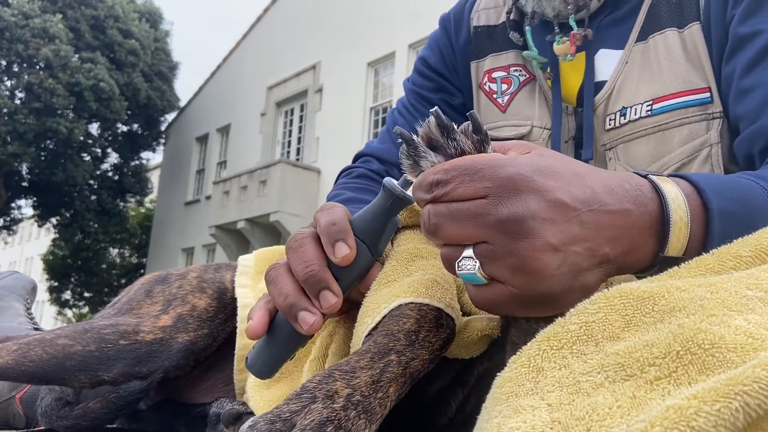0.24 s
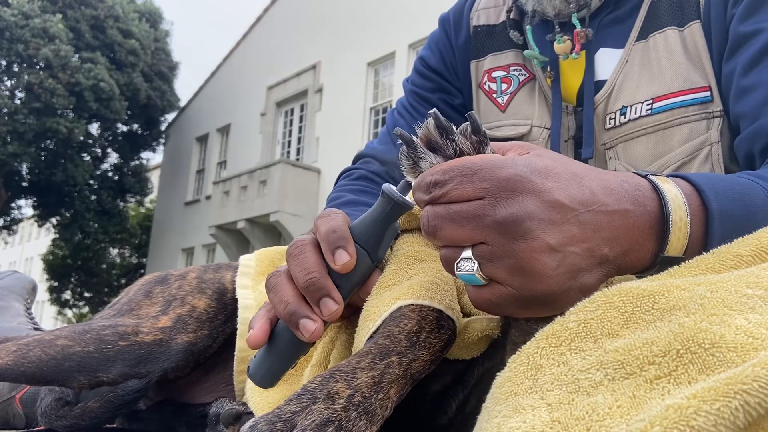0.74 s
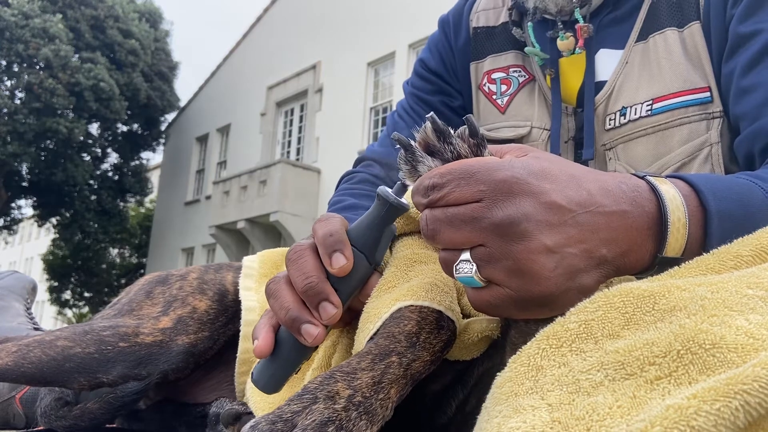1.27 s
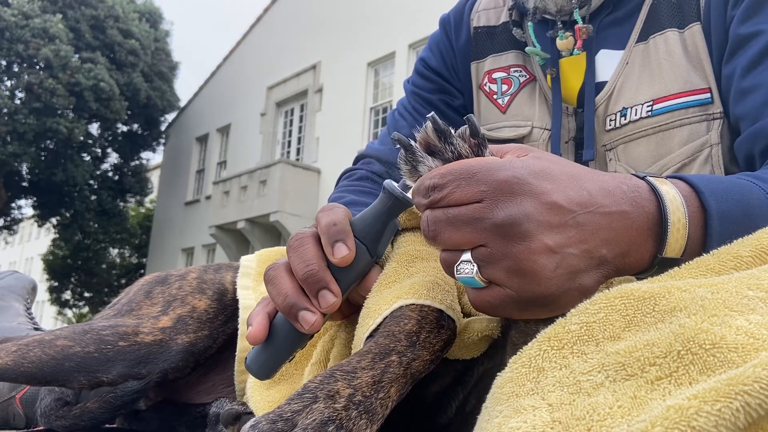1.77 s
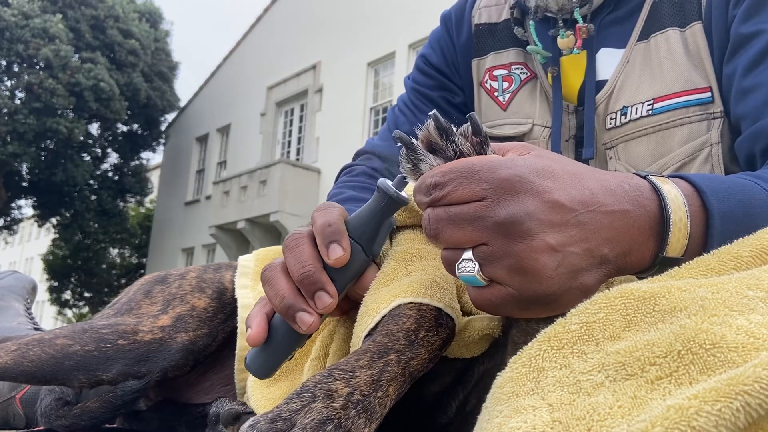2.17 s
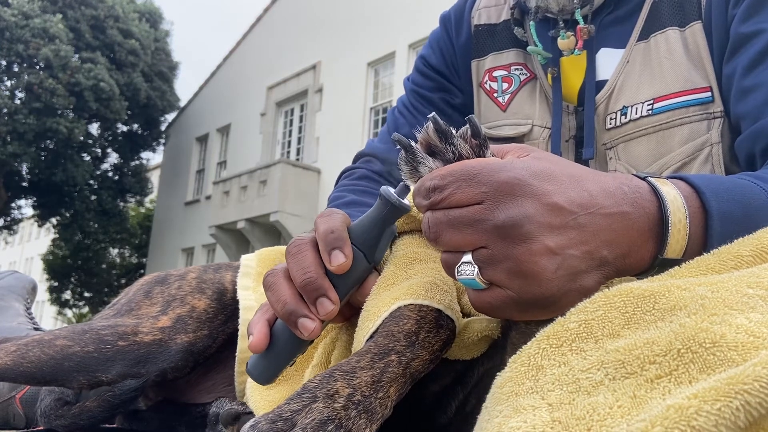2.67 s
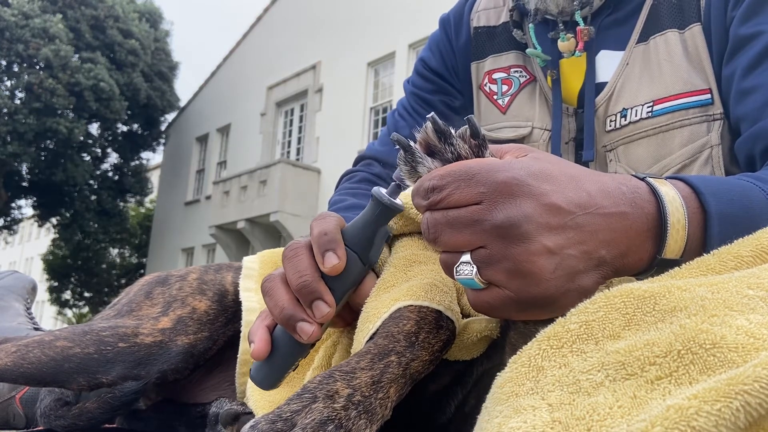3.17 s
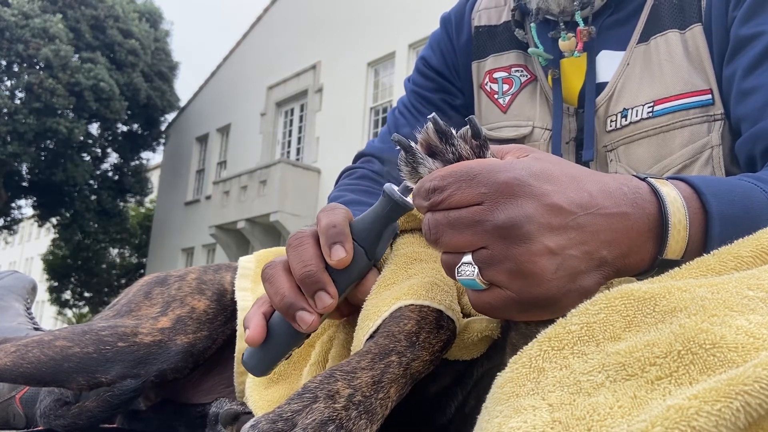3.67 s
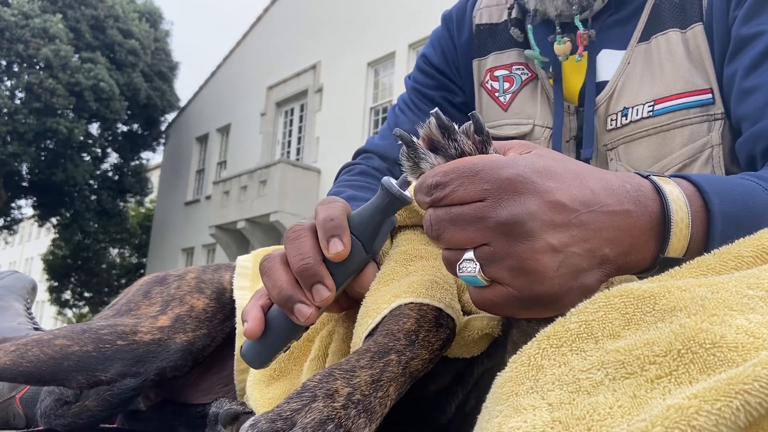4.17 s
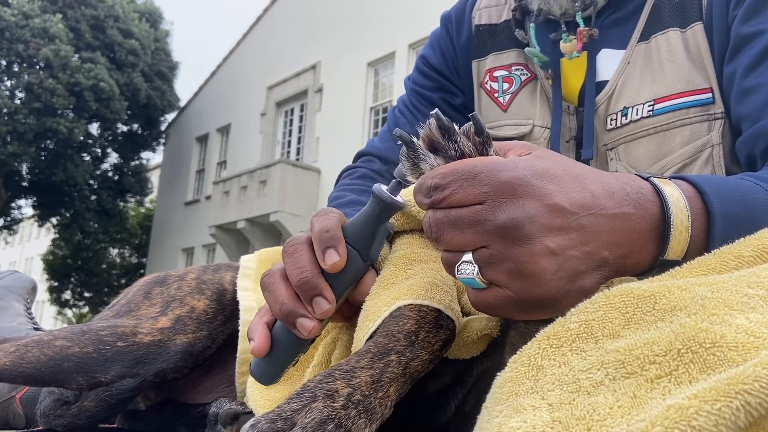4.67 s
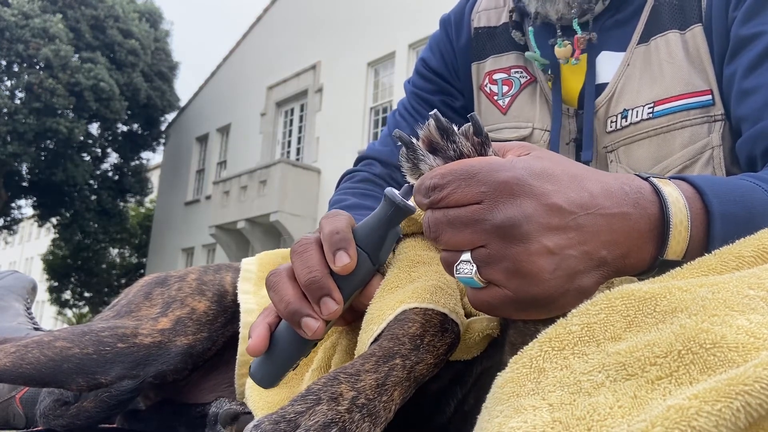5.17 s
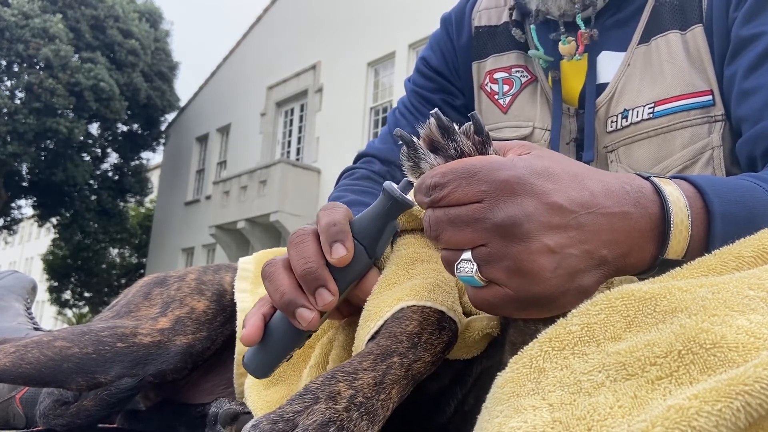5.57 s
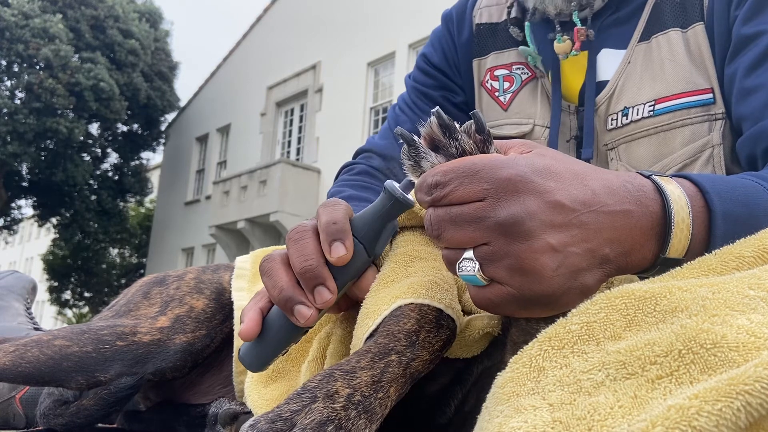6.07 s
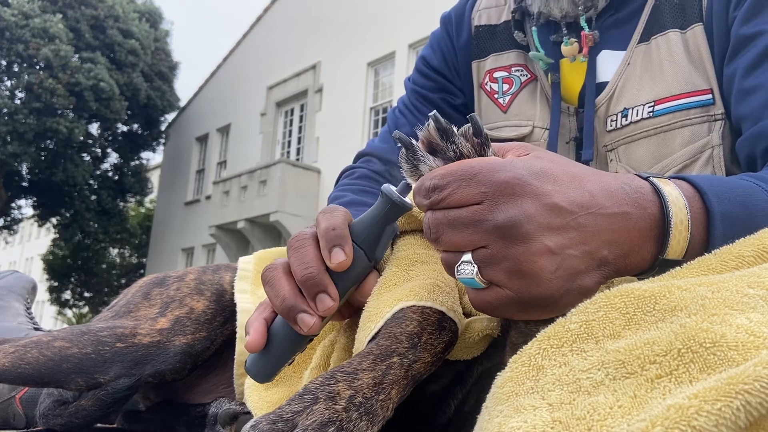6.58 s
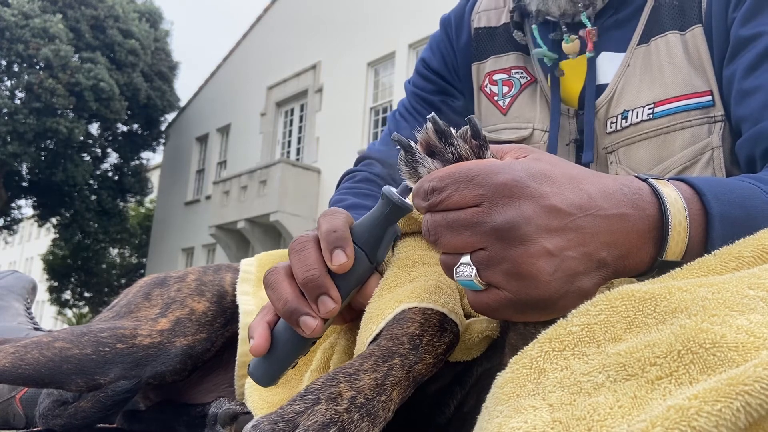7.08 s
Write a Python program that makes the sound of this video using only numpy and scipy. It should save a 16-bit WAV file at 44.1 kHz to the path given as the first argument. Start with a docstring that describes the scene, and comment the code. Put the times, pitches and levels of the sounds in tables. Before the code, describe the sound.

Outdoors, very close to a phone microphone, a handheld rotary tool grinds a dog's nail. Its buzzy whine sags under pressure, with dry gritty rasp and rattling plastic. Long strokes come first, then shorter ones separated by brief, cleaner, higher free spins. A distant engine revs and runs down midway over steady low traffic rumble. The last long stroke is still grinding at the end.

```python
"""A cordless rotary tool files a dog's nail outdoors, close to a phone, over a steady town rumble.
It starts with the drum going down on the nail: the motor whine sags, the spindle buzzes and rattles in
the plastic housing, and the grit rasps once a turn. From about 2 s, short free runs part some strokes and
the pitch climbs back. From 3 s a distant engine revs up, then runs down and fades after 6.4 s.
The last, long stroke starts at 6.2 s and is still grinding at the end. Tones and shaped noise make it all."""
import sys
import numpy as np
from scipy import signal
from scipy.fft import rfft, irfft
from scipy.io import wavfile
from scipy.ndimage import uniform_filter1d, map_coordinates

SR = 44100
rng = np.random.default_rng(int(sys.argv[2]) if len(sys.argv) > 2 else 0)


def file_out(sig):
    """Save sig as 16-bit WAV at sys.argv[1]."""
    # one column per channel
    cols = np.atleast_2d(sig).T
    # limit, then scale
    lim = np.clip(cols, -1, 1)
    pcm = np.round(lim * 32767).astype(np.int16)
    wavfile.write(sys.argv[1], SR, pcm)


N = 322812
TIME = np.arange(N) / SR  # s
FREQ = np.arange(N // 2 + 1) * SR / N  # Hz


def undb(db):
    """Decibels to gain."""
    return 10 ** (np.asarray(db) / 20)


def unit(x):
    """Scale to rms 1."""
    return x / np.sqrt(np.mean(x ** 2))


def curves(table):
    """The columns of a timed table, one value a sample."""
    s, *columns = np.transpose(table)
    return [np.interp(TIME, s, c) for c in columns]


def response(points):
    """Gain at every frequency from (frequency [Hz], level [dB]) points."""
    hz, db = np.transpose(points)
    return undb(np.interp(np.log(FREQ + 1), np.log(hz), db))


def shape(x, gain):
    """Filter by a frequency response."""
    return irfft(rfft(x) * gain, N)


def noise():
    """White noise."""
    return rng.standard_normal(N)


def walk(rate_hz):
    """Smooth random drift of rms 1 that moves up to about rate_hz."""
    steps = rng.standard_normal(N // 16)
    for _ in range(2):
        steps = uniform_filter1d(steps, size=4)
    return unit(np.interp(TIME * rate_hz * 8, np.arange(len(steps)), steps))


def swell(middle, length):
    """A smooth rise to 1 and fall back, length seconds from foot to foot."""
    return np.cos(np.pi * np.clip((TIME - middle) / length, -.5, .5)) ** 2


def swells(table):
    """Rows of (middle, length, heights ..) summed to one curve for each height."""
    return sum(np.outer(heights, swell(middle, length)) for middle, length, *heights in table)


def press(start, end, attack, release):
    """Approaches 1 from start to end, then dies away; attack and release are time constants in seconds."""
    rise = 1 - np.exp(-np.clip(TIME - start, 0, end - start) / attack)
    return rise * np.exp(-np.maximum(TIME - end, 0) / release)


def tone(turns, order, flutter, flutter_hz, beat=1):
    """One multiple of a shaft's speed, at rms 1 before any beat, fluttering in level and phase."""
    wobble = 1 + flutter * (walk(flutter_hz) + 1j * walk(flutter_hz))
    wobble = wobble / np.sqrt(.5 + flutter ** 2)
    return np.real(beat * wobble * np.exp(2j * np.pi * (order * turns + rng.random())))


# the drum is laid on the nail: (start [s], lifted [s], loss of speed it tends to [turns/s],
# time constant of the sag [s], rise of buzz [dB], rise of rasp [dB], rise of rattle [dB])
STROKES = [(0, .302, 26.1, 0.095, 0, 0.5, 2), (0.301, 1.234, 45.96, 0.16, 2, 1.5, 3),
           (1.567, 2.162, 41.16, 0.17, -1, -0.5, 2), (2.369, 2.987, 48.22, 0.059, -2, 0.5, 2),
           (3.37, 3.683, 50.36, 0.056, -3, -1, 4), (4.153, 4.438, 41.13, 0.038, -3, 0, 2.5),
           (4.916, 5.373, 44.9, .111, -1, 0, 0.5), (5.773, 6.115, 47.36, 0.083, -2, 0.5, 3),
           (6.203, 7.397, 39.98, 0.1, -2, 0.1, 2)]
# the hand leans in harder: (middle [s], length [s], further loss of speed [turns/s])
LEANS = [(0.78, 0.44, 3.8), (1.85, 0.47, 9.9), (2.58, 0.17, 4.2), (2.93, 0.41, 9.7), (3.73, 0.1, 8.4),
         (4.37, 0.32, 10.8), (6.29, 0.4, 16.3), (6.64, 0.37, 19.5), (6.88, 0.29, 13.4), (7.2, 0.33, 11.6)]
FREE_HZ, RECOVER_S = 293.4, .149  # turns a second when free; time constant of winding up again


def spindle():
    """Turns a second: each stroke and lean drags the motor down, and it winds up again when lifted."""
    drag = sum(loss * press(start, end, sag, RECOVER_S) for start, end, loss, sag, *_ in STROKES)
    return FREE_HZ - drag - swells(LEANS)[0]


TOUCH_S = .0048  # time constant of the drum settling on the nail or leaving it


def pressure():
    """Near 1 while the drum lies on the nail, near 0 while it is lifted."""
    return sum(press(start, end, TOUCH_S, TOUCH_S) for start, end, *_ in STROKES)


# the drum spins clear of the nail: (start [s], end [s], rise of the commutator's tone [dB])
FREE_RUNS = [(2.21, 2.34, -1.5), (3.775, 4.145, -.5), (4.565, 4.895, .5), (5.49, 5.745, 3)]
CLEARING_S = .03  # time constant of coming clear


def free_running():
    """Near 1 while the drum spins clear of the nail, and the commutator's rise (dB) then."""
    return sum(np.outer([1, db], press(start, end, CLEARING_S, TOUCH_S)) for start, end, db in FREE_RUNS)


# firm seating drives the shell: (middle [s], length [s], rise of hum [dB], of whine [dB], of buzz [dB])
GRIPS = [(.05, 0.68, 11.5, 4, 2.5), (.3, 0.19, 11.5, 2.5, 0), (.57, 0.41, 1.5, 5, -1),
         (.74, 0.19, 6, 4, -3.5), (.97, 0.35, 0, 5.5, -1.5), (1.15, 0.26, 4.5, 3.5, -1.5),
         (1.63, 0.16, 10, 2, 4.5), (2.56, 0.25, 5.5, -7, 2), (2.84, 0.21, 6, 3, 4),
         (3.65, 0.17, 0.5, 6, -2.5), (4.35, 0.11, 10.5, 1, 1.5), (4.98, 0.22, 10.5, 2, 6),
         (5.22, 0.25, -1.5, 1, 1.5), (5.76, 0.2, 5, -0.5, 1.5), (6.27, 0.14, 4, 3, -1),
         (6.38, 0.25, 0, 5, -0.5), (6.63, 0.28, 4.5, -0.5, 0.5), (7.07, 0.15, 0.5, 2.5, 2.5)]
# the two strong tones dip briefly: (middle [s], length [s], loss of hum [dB], loss of whine [dB])
DIPS = [(.86, .12, -4, 5), (1.035, 0.068, -3, 21), (1.22, 0.034, 12, 18), (1.77, .08, 7, 7),
        (2.16, 0.11, 3, 16), (2.39, .09, 2, -1), (3.01, 0.23, 5, 10), (3.38, 0.23, -2, 7),
        (4.17, .05, -2, 15), (4.44, 0.2, 1, 3), (4.955, 0.063, -4, 12), (6.17, .08, 0, 1),
        (6.71, 0.12, 12, 8), (6.89, 0.13, 28, -3), (6.99, 0.065, 6, 7)]
# the drum skips on the nail: (middle [s], length [s], rise of rattle [dB])
SKIPS = [(.23, 0.35, 6), (1.07, 0.29, 3.5), (1.46, 0.64, 4.5), (1.9, .11, 4.5), (2.09, 0.09, 2),
         (3.23, 0.51, 7), (4.25, 0.15, 3), (4.53, 0.16, -3.5), (5.46, 0.13, 4), (6, 0.16, 2.5),
         (6.81, 0.14, 4), (7.16, 0.12, 4)]
# the grit cuts into the nail's edge: (middle [s], length [s], rise of rasp [dB])
SCRAPES = [(.05, 0.24, 2), (.85, 0.15, 1.5), (1.25, 0.17, 5.5), (1.9, 1, 3.5), (2.52, 0.6, 2),
           (2.98, 0.14, 2.5), (3.67, .1, 3), (4.32, 0.3, 4.5), (4.98, 0.21, 4), (6.76, 0.22, 3.5),
           (7.24, 0.092, 4)]
# base levels, before the moves above
HUM_DB, WHINE_DB, BUZZ_DB, RATTLE_DB, GRIT_DB = -38, -34, -31, -38.5, -38.5
LIFT_DB, LIFT_DELAY_S, LIFT_S = 2, .068, .16  # slackening after each lift: depth, delay of its middle, length
SKIP_DUCK = .44  # dB of slackening for each dB of skipping
FREE_RATTLE_DB = -6  # change of rattle when clear of the nail


def contact():
    """Levels of hum, whine, buzz, rattle and grit (dB) from the way the drum meets the nail."""
    load, bite, shake = sum(np.outer(rises, press(start, end, TOUCH_S, TOUCH_S))
                            for start, end, _, _, *rises in STROKES)
    lift = sum(swell(end + LIFT_DELAY_S, LIFT_S) for _, end, *_ in STROKES)
    hum_grip, whine_grip, buzz_grip = swells(GRIPS)
    hum_dip, whine_dip = swells(DIPS)
    skip, = swells(SKIPS)
    scrape, = swells(SCRAPES)
    free, _ = free_running()
    slack = LIFT_DB * lift + SKIP_DUCK * skip
    hum_db = HUM_DB + hum_grip - hum_dip - slack
    whine_db = WHINE_DB + whine_grip - whine_dip - slack / 4
    buzz_db = BUZZ_DB + load + buzz_grip - slack
    rattle_db = RATTLE_DB + shake + skip + FREE_RATTLE_DB * free
    grit_db = GRIT_DB + bite + scrape
    return hum_db, whine_db, buzz_db, rattle_db, grit_db


# the touched spot favours a band of overtones: (middle [s], length [s], centre [Hz], rise [dB])
RINGS = [(0.475, 0.33, 3900, 4.5), (0.513, 0.46, 520, 6.5), (0.562, 0.1, 2720, 8), (0.65, 0.33, 2200, 7),
         (0.766, 0.45, 1900, 5.5), (0.82, .12, 3800, 3), (0.986, 0.13, 2410, 6), (1.071, 0.095, 1203, 11),
         (1.194, 0.05, 3050, 13), (1.82, 0.48, 490, 6), (2.035, 0.14, 4700, 15), (2.136, 0.11, 500, 11),
         (2.551, 0.27, 1160, 6.5), (2.7, 1, 5300, 4), (2.85, 0.57, 1200, 3.5), (2.879, 0.54, 1670, -0.5),
         (3.54, 0.53, 1600, 5.5), (4.255, 0.19, 1810, 9.5), (4.267, 0.24, 2700, 3), (5.01, 0.11, 2670, 8.5),
         (5.054, 0.096, 496, 4), (6.02, 0.31, 1748, 6.5), (6.36, 0.53, 1610, 7), (6.668, 0.17, 2800, 4.5),
         (6.71, 0.41, 1751, 6.5), (7.24, .1, 2650, 8)]
RING_OCTAVES = .18  # distance from the centre at which the rise in dB falls to 1/e


def rings(speed, orders):
    """Rise (dB) of each multiple of the speed while it lies in a favoured band."""
    middle, length, hz, db = np.transpose(RINGS)
    octaves = np.log2(np.outer(orders, np.interp(middle, TIME, speed)) / hz)
    closeness = np.exp(-(octaves / RING_OCTAVES) ** 2)
    return (db * closeness) @ np.array([swell(*span) for span in zip(middle, length)])


BEATS_PER_TURN = .0964  # how far the bearing tone lies above the whine, in multiples of the speed
BEAT_FREE, BEAT_PRESSED = .52, .17  # its size against the whine


def beating(turns, pressed):
    """A bearing tone just above the whine makes it swell and weaken, most deeply when the drum is lifted."""
    size = np.interp(pressed, [0, 1], [BEAT_FREE, BEAT_PRESSED])
    phase = 2 * np.pi * BEATS_PER_TURN * turns + .8 * walk(7)
    return (1 + size * np.exp(1j * phase)) / np.sqrt(1 + size ** 2)


def bounce(turns, rattle_db):
    """A skipping drum bounces about every fourth turn and chops the motor's tones and its own chatter."""
    depth = np.interp(rattle_db, [-35, -29], [0, .5])
    chop = 1 + depth * np.cos(2 * np.pi * turns / 4 + walk(8))
    return chop / np.sqrt(1 + depth ** 2 / 2)  # keep the power


DRONE_DB, SECOND_DB = -50.5, -15.5  # the spindle's own tone; its octave, relative to the buzz level


def motor(turns, speed, beat, hum_db, whine_db, buzz_db):
    """The motor's two strong tones, at 3 and 4 times the speed, over the unbalanced spindle's soft drone."""
    drone = undb(DRONE_DB) * tone(turns, order=1, flutter=.3, flutter_hz=8)
    octave_db = SECOND_DB + buzz_db + rings(speed, [2])[0]
    octave = undb(octave_db) * tone(turns, order=2, flutter=.3, flutter_hz=8)
    hum = undb(hum_db) * tone(turns, order=3, flutter=.18, flutter_hz=15)
    whine = undb(whine_db) * tone(turns, order=4, flutter=.12, flutter_hz=20, beat=beat)
    return drone + octave + hum + whine


# resonances of the plastic shell, before its tilt: (centre [Hz], width [Hz], level [dB])
HOUSING = [(761.7, 19.4, 16), (1006, 185, 8), (1180, 83, 3), (1501, 125, 7), (1665, 300, 5.5),
           (2220, 340, 5), (2730, 210, -3.5), (3162, 176, 1.5), (3740, 200, -10), (5090, 67, 6)]


def housing(force, tilt_db, low_hz):
    """The plastic shell rings in its modes; it is too small to radiate bass."""
    s = 1j * FREQ
    modes = sum(undb(db) * s * width / (hz ** 2 + s * width + s ** 2) for hz, width, db in HOUSING)
    tilt = undb(tilt_db * np.log2(1 + FREQ / 1000))
    bass_cut = FREQ ** 4 / (FREQ ** 4 + low_hz ** 4)
    return unit(shape(force, modes * tilt * bass_cut))


# free motor's tones entering the shell: (multiple of the speed, level against buzz overtones [dB])
FREE_TONES = [(5, -7), (6, 3.5), (7, -5), (8, -3), (9, -9), (10, -5.5), (11, -6), (12, -0.5), (13, -2.5),
              (14, -3), (15, -3)]
COMMUTATOR_ORDER = 6  # multiple of the speed


def buzz(turns, speed, buzz_db):
    """Spindle overtones in the shell; load makes them bright and ragged, and they jump as contact shifts."""
    load = np.interp(speed, [245, 285], [1, .45])  # a slower spindle means a heavier load
    shaken = turns + .0035 * load * walk(70)
    orders = np.arange(5, 26)
    overtones = 0
    for k, ring_db in zip(orders, rings(speed, orders)):
        ragged = tone(shaken, order=k, flutter=min((k / 14) ** 2.5, .8), flutter_hz=3 * k)
        bright_db = .07 * (buzz_db + 32) * min(k - 6, 3)
        top_loss_db = np.interp(k, [16, 19], [0, 9])
        dull_db = (1 - load) * np.interp(k, [8, 14], [0, 7])
        jump_db = 3.7 * load * np.tanh(2 * walk(13))
        overtones = overtones + ragged * undb(bright_db - top_loss_db + ring_db + jump_db - dull_db)
    # clear of the nail, only the motor's own cleaner tones are left
    free, commutator_db = free_running()
    running = 0
    for k, db in FREE_TONES:
        level_db = db + commutator_db * (k == COMMUTATOR_ORDER) + 1.5 * walk(12)
        running = running + undb(level_db) * tone(turns, k, flutter=(k / 12) ** 2, flutter_hz=3 * k)
    force = (1 - free) * overtones * undb(1.6 * load * walk(30)) + free * running
    return housing(force, tilt_db=-3.4, low_hz=500)


# grit on nail, before singing and sizzle: (frequency [Hz], relative level per Hz [dB])
RASP = [(300, -25), (1500, -4), (3000, -1), (4500, -1), (6000, -1), (7000, -1.5), (7800, 2), (9000, 1.3),
        (10500, .3), (11700, -4.5), (13500, -1), (14800, -3), (15600, -1)]
# the finest sizzle grows as the grit bites: (rasp level [dB], mean gain above 13 kHz [dB])
SIZZLE = [(-39, -3.5), (-37.5, 0.5), (-30, 5)]
# band in which a deep cut sings: centre, half width to 1/e, its most gain on the repeating scratch
SING_HZ, SING_WIDTH_HZ, SING_DB = 6300, 1200, -3


def grit(turns, grit_db):
    """The same grains cross the nail each turn, among fresh scratches; the drum's high side bites hardest."""
    # rows are states of the contact patch as it wanders along the drum, columns go once round it
    drum = rng.standard_normal((12, 180))
    place = [(TIME * 14) % len(drum), turns % 1 * drum.shape[1]]
    repeating = unit(map_coordinates(drum, place, order=3, mode="grid-wrap"))
    hold = np.interp(grit_db, [-40, -33], [.4, .85])  # firmer contact repeats more closely
    scratch = hold * repeating + np.sqrt(1 - hold ** 2) * noise()
    bite_db = 3.5 * hold * np.cos(2 * np.pi * turns) + walk(300) + .7 * walk(10)
    rasp = shape(scratch * undb(bite_db), response(RASP))
    # a deep cut makes the repeating scratch sing in one band
    band = np.exp(-((FREQ - SING_HZ) / SING_WIDTH_HZ) ** 2)
    depth = np.interp(grit_db, [-37, -33], [0, 1])
    rasp = rasp + depth * undb(SING_DB) * shape(repeating, band)
    # the finest sizzle comes and goes with the angle of the drum
    sizzle = shape(rasp, np.clip((FREQ - 11000) / 2000, 0, 1))
    sizzle_db = np.interp(grit_db, *np.transpose(SIZZLE)) + 1.9 * walk(8)
    return unit(rasp + sizzle * (undb(sizzle_db) - 1))


def knocks(turns, slip, scatter_db):
    """One knock a turn, early or late by slip (turns) and uneven in strength."""
    whole = np.arange(1, int(turns[-1]))
    chance = rng.standard_normal((len(whole), 2))
    at = np.interp(whole + slip * chance[:, 0], turns, np.arange(N))
    # short sinc pulses place each knock between samples
    taps = at.astype(int)[:, None] + np.arange(-7, 9)
    pulse = np.sinc(taps - at[:, None]) * undb(scatter_db * chance[:, 1:])
    return np.bincount(np.clip(taps, 0, N - 1).ravel(), pulse.ravel(), N)


def rattle(turns):
    """A loosely touching drum chatters: knocks of uneven timing and strength, with scraping between them."""
    force = unit(knocks(turns, slip=.16, scatter_db=2.2)) + .85 * noise()
    return housing(force, tilt_db=-4.5, low_hz=537)


# the drum catches the nail: (time [s], level in the rattle [dB], time constant of fading [s])
CATCHES = [(.262, -33, .02), (.345, -33, .02), (1.012, -35, .03), (1.37, -33, .025), (1.455, -33, .015),
           (1.562, -33, .025), (1.603, -38, .04), (1.878, -34, .03), (2.125, -35, .02), (2.372, -35, .04),
           (3.025, -32, .025), (3.728, -32, .015), (4.155, -33, .03), (4.27, -32, .02), (4.45, -31, .025),
           (4.5, -34, .03), (4.56, -33, .015), (4.902, -28, .025), (5.464, -34, .015), (5.76, -30.5, .022),
           (5.955, -34, .02), (6.735, -34, .04), (7.135, -36, .015)]


def catches():
    """Each catch starts at once and dies away as the drum settles."""
    return sum(undb(db) * (TIME >= s) * np.exp(-np.abs(TIME - s) / fade) for s, db, fade in CATCHES)


WHIR_HZ, WHIR_WIDTH_HZ, WHIR_DB = 956, 157, -42.5  # centre, half width to 1/e, level


def whir():
    """The bearings roll on in a narrow band of noise, whether or not the drum touches."""
    band = np.exp(-((FREQ - WHIR_HZ) / WHIR_WIDTH_HZ) ** 2)
    return undb(WHIR_DB) * unit(shape(noise(), band))


# shading of the right microphone: (frequency [Hz], left minus right [dB])
SHADE = [(520, 0), (660, 11), (750, 17), (870, 8), (1000, 3), (1200, 0), (1500, 5.4), (1750, 5.3),
         (2050, 1.8), (3200, 3.2), (4450, 7.8), (5400, 7.7), (7500, .6), (9000, 0)]
# phase between the microphones: (frequency [Hz], lead of the left [rad])
LEAD = [(0, 0), (400, .35), (640, 1.3), (850, -.8), (1150, 0), (1400, 1.1), (1650, .5), (2700, 1.3),
        (4400, 1), (5300, 2.4), (6300, .6), (7200, 0), (9000, -3.14), (15300, -12.57)]


def ports(x, scattered=None, share=0):
    """Two microphones: the right is shaded and out of step; hands and body scatter a share of its power."""
    path = np.exp(-1j * np.interp(FREQ, *np.transpose(LEAD))) / response(SHADE)
    right = shape(x, np.sqrt(1 - share) * path)
    if scattered is not None:
        right = right + shape(scattered, np.sqrt(share) * path)
    return np.array([x, right])


# distant engine: (time [s], firing rate [Hz], firing tone [dB], second-order overtone [dB])
ENGINE = [(2.999, 50.5, -34, -55), (3.331, 78.3, -41.5, -47.5), (3.55, 95.1, -41, -55.5),
          (3.73, 99.3, -36, -51.5), (4.43, 87.22, -36.5, -47.5), (4.6, 85, -35.5, -50),
          (4.72, 81.2, -43.5, -48), (5.03, 74.2, -46, -48.5), (5.29, 74.1, -43.5, -46),
          (5.74, 75.8, -41.5, -48), (5.95, 67, -45, -69), (6.27, 47.88, -41, -62), (6.401, 42.2, -64, -60)]
# its overtones: (multiple of the firing rate, level against the second-order overtone [dB])
ENGINE_ORDERS = [(2, 0), (3, 0.5)]
ENGINE_FADE_S = .26  # time constant of fading in and out


def engine():
    """A distant engine revs up and runs down; only its low firing tones carry."""
    hz, firing_db, overtones_db = curves(ENGINE)
    turns = np.cumsum(hz) / SR  # counted in firings
    firing = tone(turns, order=1, flutter=.2, flutter_hz=6)
    overtones = sum(undb(db) * tone(turns, k, flutter=.2, flutter_hz=4) for k, db in ENGINE_ORDERS)
    heard = press(ENGINE[0][0], ENGINE[-1][0], ENGINE_FADE_S, ENGINE_FADE_S)
    return heard * (undb(firing_db) * firing + undb(overtones_db) * overtones)


# town background: (frequency [Hz], relative level per Hz [dB])
TOWN = [(20, -18), (35, -16), (55, 0.5), (80, -1), (130, -5), (200, -12), (350, -15.5), (600, -17),
        (1500, -30), (5000, -74), (16000, -154)]
TOWN_DB = -42  # mean level of the part common to both sides


def town():
    """Far traffic is low noise that swells gently; its bass is alike on both sides."""
    mid, side = (unit(shape(noise(), response(TOWN))) for _ in range(2))
    side = shape(side, np.minimum(FREQ / 450, 1))
    return undb(TOWN_DB + .5 * walk(5.9)) * np.array([mid + side, mid - side])


# scattered rasp at the right microphone: (frequency [Hz], share of power [0-1])
RASP_SCATTER = [(2500, .3), (4500, .6), (7500, .14)]


def scene():
    """All the tool's sounds follow one spindle; engine and town lie behind."""
    speed = spindle()
    hum_db, whine_db, buzz_db, rattle_db, grit_db = contact()
    turns = np.cumsum(speed * (1 + .003 * walk(22))) / SR  # the speed is slightly unsteady
    chop = bounce(turns, rattle_db)
    beat = beating(turns, pressure())
    tones = motor(turns, speed, beat, hum_db, whine_db, buzz_db) * chop
    tones = tones + undb(buzz_db) * buzz(turns, speed, buzz_db) + whir()
    catch = catches()
    # two independent takes of each noise: direct and scattered
    chatter = [(undb(rattle_db) * chop + catch) * rattle(turns) for _ in range(2)]
    rasp = [(undb(grit_db) + catch / 4) * grit(turns, grit_db) for _ in range(2)]
    rasp_share = np.interp(FREQ, *np.transpose(RASP_SCATTER))
    tool = ports(tones) + ports(*chatter, share=.51) + ports(*rasp, share=rasp_share)
    return tool + engine() + town()


TOP_HZ = 15800  # upper edge of the phone's band


def record(dry):
    """The phone cuts the top with a steep low-pass."""
    low_pass = signal.ellip(12, .1, 80, TOP_HZ, fs=SR, output="sos")
    return signal.sosfilt(low_pass, dry)


dry = scene()
out = record(dry)
file_out(out)
```